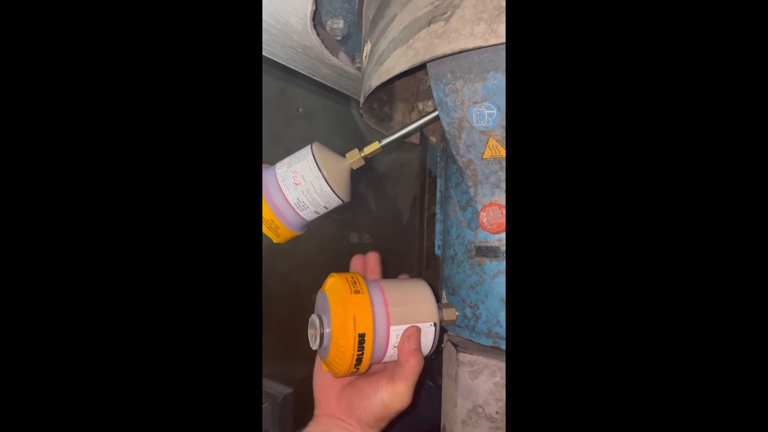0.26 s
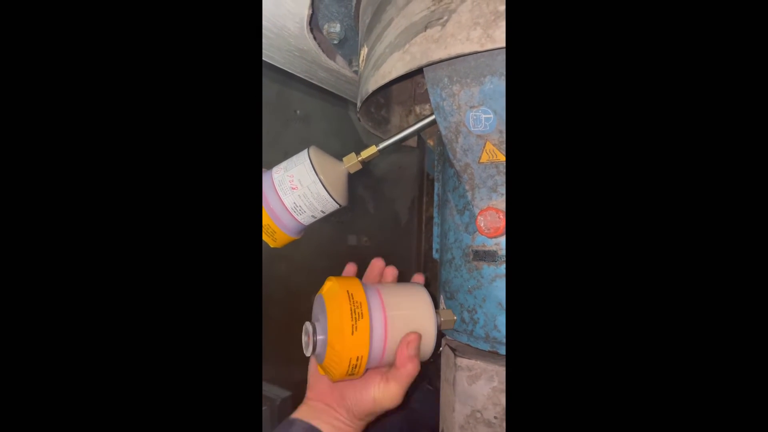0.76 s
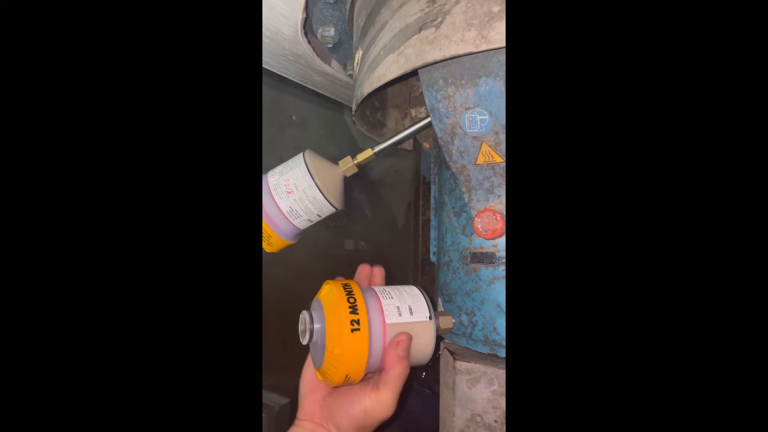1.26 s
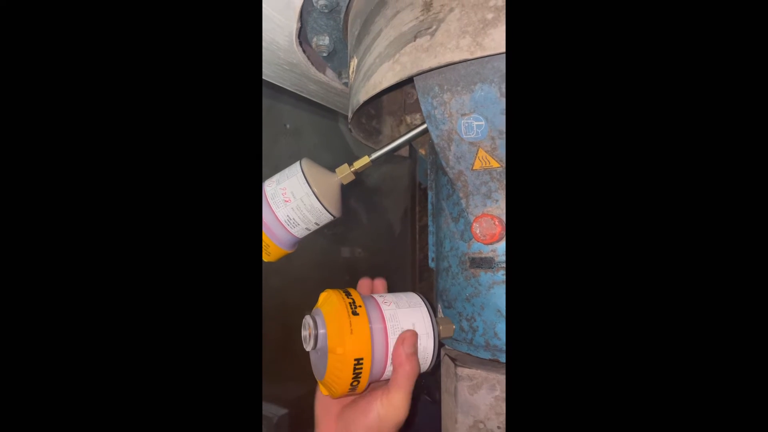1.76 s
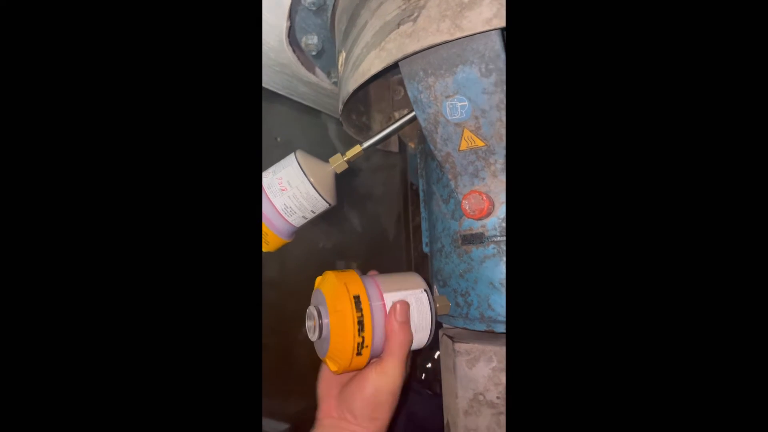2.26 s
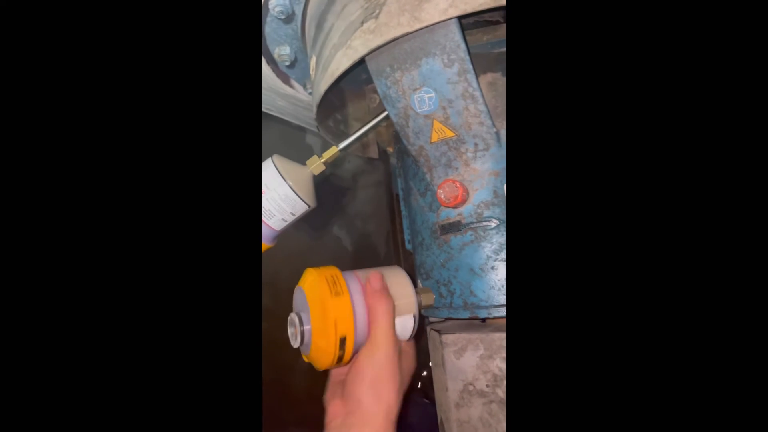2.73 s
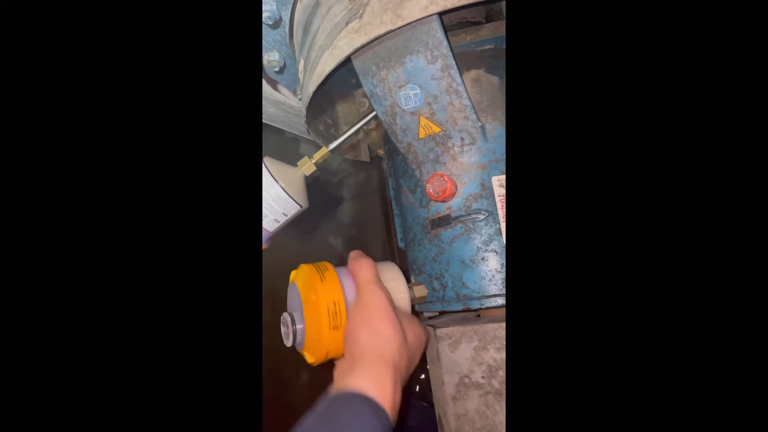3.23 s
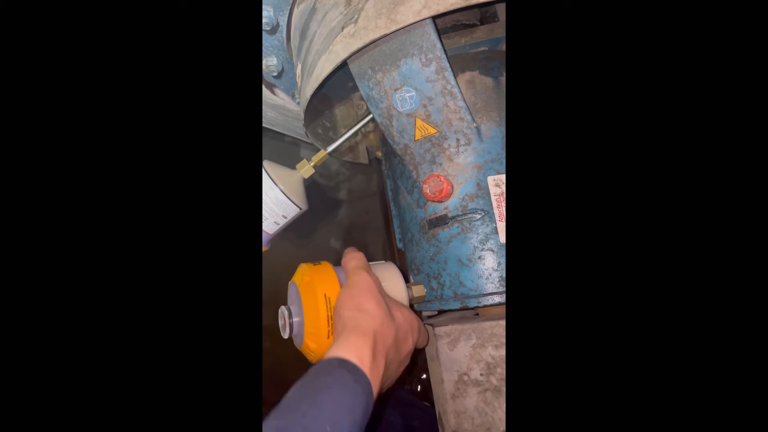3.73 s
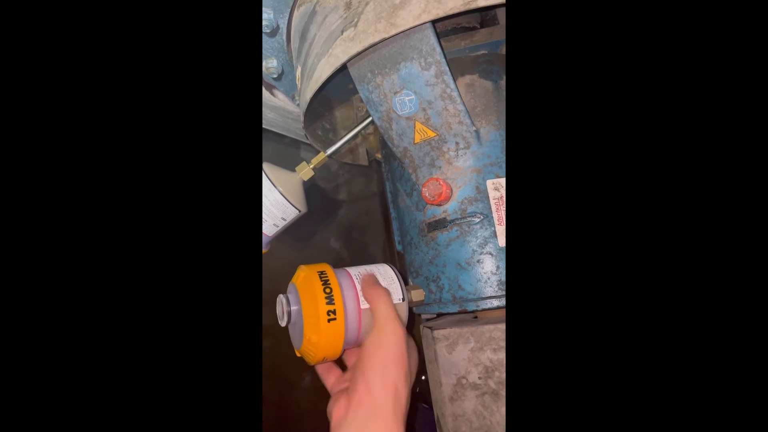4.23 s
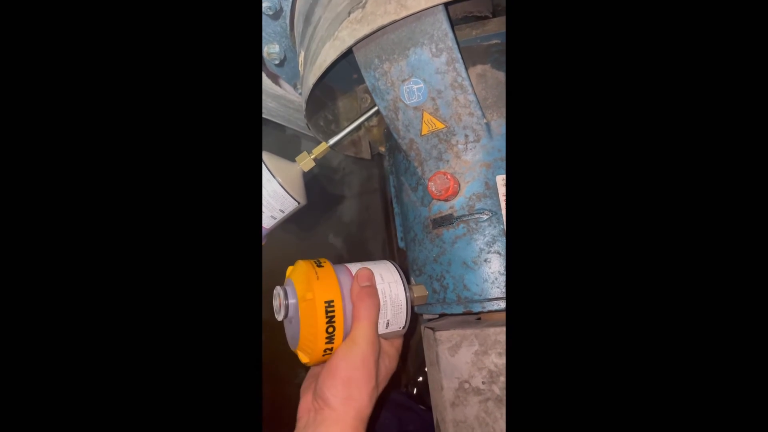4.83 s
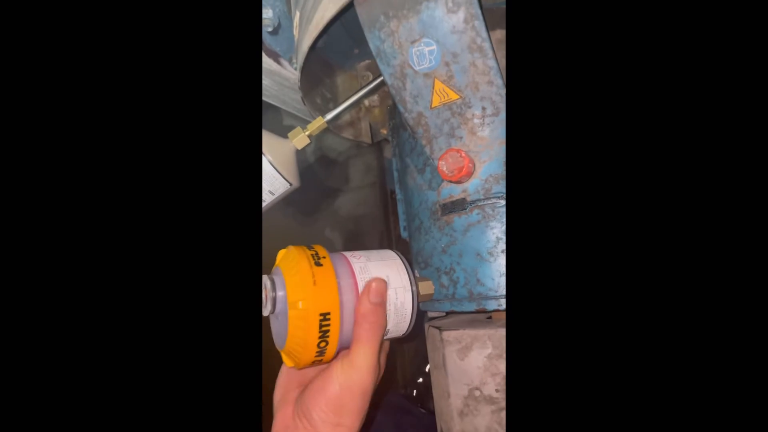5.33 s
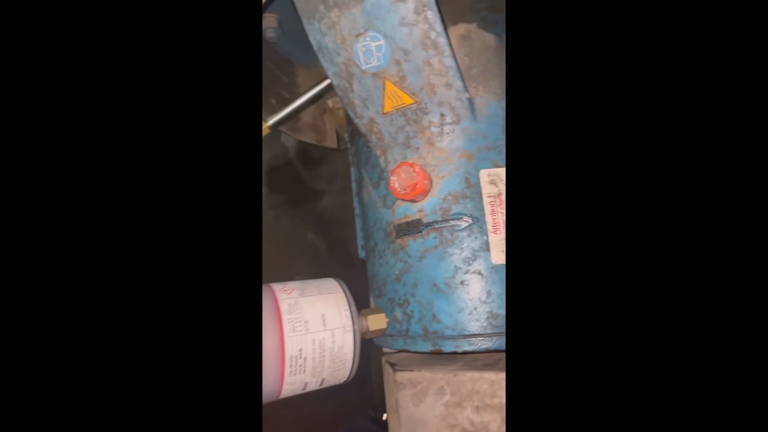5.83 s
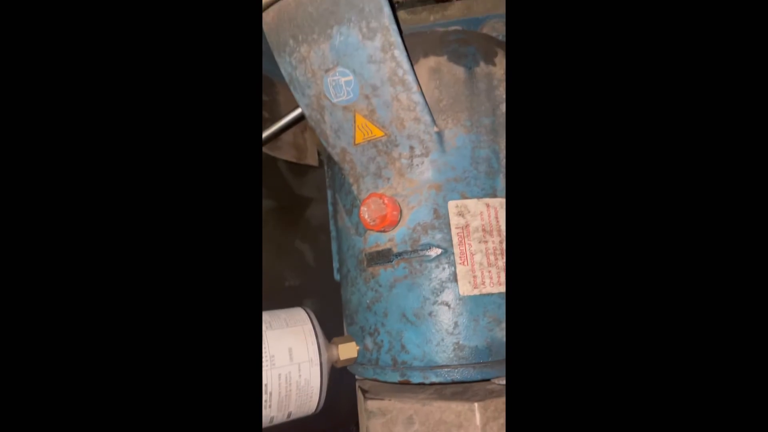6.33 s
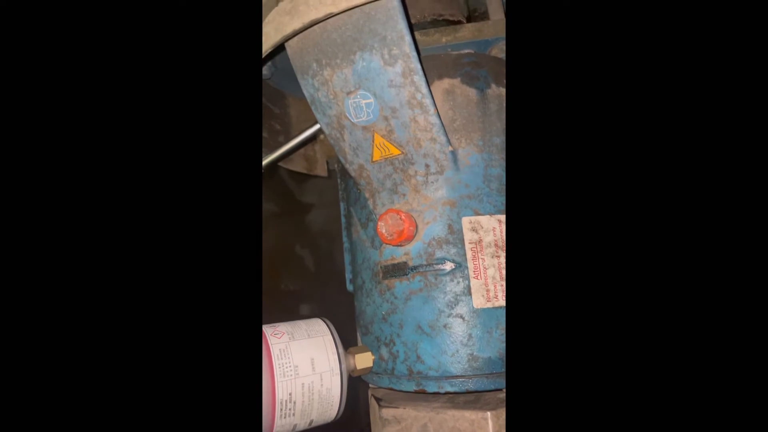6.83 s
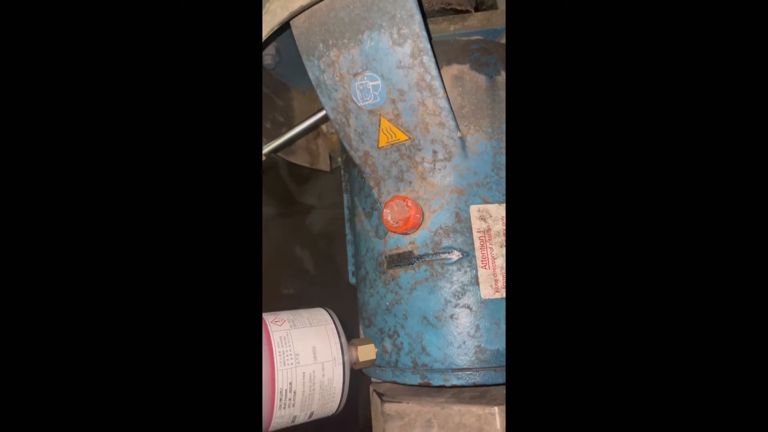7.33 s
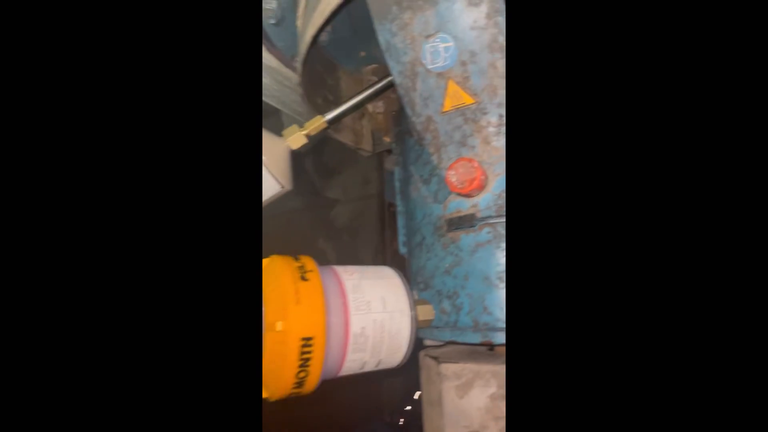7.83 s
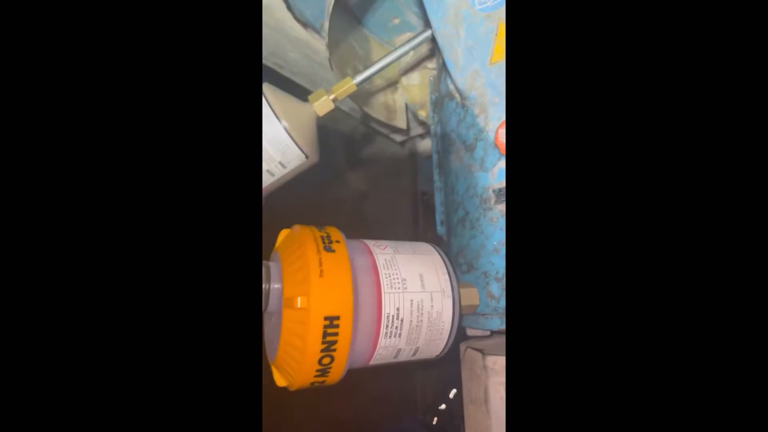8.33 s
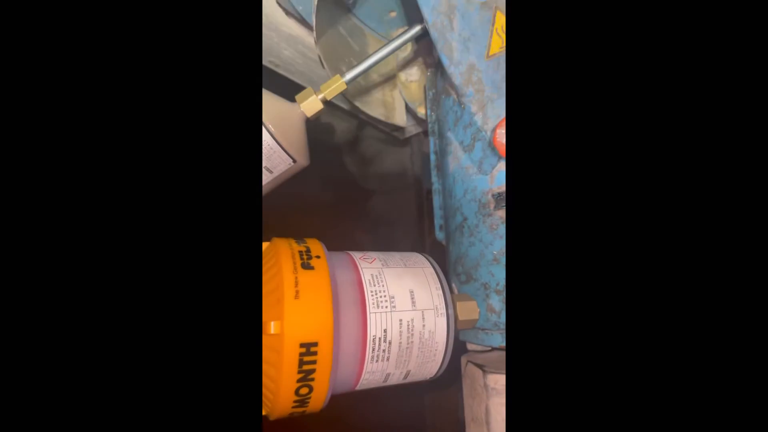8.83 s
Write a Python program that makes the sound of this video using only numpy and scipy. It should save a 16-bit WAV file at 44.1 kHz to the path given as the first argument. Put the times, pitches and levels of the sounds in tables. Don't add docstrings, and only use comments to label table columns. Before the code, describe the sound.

Close, continuous machine rush and deep electrical hum, metallic whines swelling and fading, while a screwed-on grease canister gives a few tiny bright clicks.

```python
import sys
import numpy as np
from scipy import signal
from scipy.fft import rfft, irfft, next_fast_len
from scipy.io import wavfile
from scipy.ndimage import uniform_filter1d

SR = 44100
rng = np.random.default_rng(int(sys.argv[2]) if len(sys.argv) > 2 else 0)


def amplitude_ratio(level_db):
    exponent = np.asarray(level_db, float) / 20
    return 10 ** exponent


def digitize_waveform(pressure):
    field = np.atleast_2d(pressure).T
    bounded = np.clip(field, -1, 1)
    quanta = np.round(bounded * 32767).astype(np.int16)
    wavfile.write(sys.argv[1], SR, quanta)


N = 399987
SIZE = next_fast_len(N)
HZ = np.arange(SIZE // 2 + 1) * SR / SIZE
T = np.arange(N) / SR

# f/Hz, level/dB per Hz
RUSH = [(28, -69), (43, -56), (58, -49), (100, -49), (140, -53), (260, -56), (540, -59), (880, -62),
        (1870, -69), (3700, -69), (6000, -76), (10000, -82), (12900, -93.5), (14600, -88)]
CASING_HZ = [184, 197, 345, 445, 700, 1060, 1972, 2080, 2525, 2640, 2740, 2825, 2945, 3130, 3270, 3565,
             4210, 4410, 5750, 2330, 1500, 8080, 11970]
# width/Hz, rms level/dB, wander/dB
CASING = [(7, -29.5, .8), (6, -35, .8), (50, -42, 1.2), (20, -41.5, 1.2), (70, -37.5, 1.5), (70, -44, 2),
          (18, -49, 2), (70, -50, 1.5), (35, -45, 2.5), (40, -47, 2.5), (30, -45, 2.5), (30, -45, 2.5),
          (28, -46, 2.5), (130, -39, 1.5), (40, -54, 2), (35, -55, 2), (25, -59, 2), (30, -55, 2),
          (350, -53, 1.5), (70, -52, 2), (200, -48, 1.5), (70, -64, 1.5), (50, -71, 1.5)]
WHINE_HZ = [648.4, 1283.2, 1313.5, 2833.6]
WHINE_LEAD_RAD = [-.3, 1.0, 1.6, 1.3]
FLUTTER_DB = [1.8, 1.2, 1.2, 5]
ROUGH_RAD = [.2, .2, .25, .8]
# whine number, t/s, spread/s, left level/dB, right level/dB
LOUD_SPOTS = [(0, .5, .8, -38, -46), (0, 2.84, 2.0, -35.5, -46), (0, 4.5, 1.55, -37, -39),
              (0, 6.24, .76, -34, -40), (0, 7.62, .57, -37, -37), (0, 9.3, .5, -47, -37),
              (1, .74, 1.35, -51, -47), (1, 3.7, 1.1, -48, -37), (1, 6.32, .42, -39, -43),
              (1, 7.74, 1.1, -46, -44), (1, 8.94, .31, -41, -47), (2, .86, 1, -50, -55),
              (2, 4, 1.6, -60, -45), (2, 6.7, 1.2, -50, -44), (3, .75, .6, -55, -47),
              (3, 3.02, .2, -47, -48), (3, 6.46, .72, -38, -44), (3, 7.24, .21, -34, -40),
              (3, 8.32, .22, -55, -43)]
# t/s, peak level/dB
TICKS = [(.077, -31), (.282, -31), (.392, -30), (.594, -25), (.805, -31), (2.107, -30), (2.765, -31),
         (2.906, -24), (3.780, -32), (6.050, -30), (6.360, -31), (7.480, -30)]
HUM_HZ = [59.6, 83.1, 117.8, 120, 155.4, 235.5, 296.1, 328.4, 357, 360, 471, 824.7, 835.8, 845.9, 1400.7,
          1716.3, 3428.8]
HUM_DB = [-42, -40, -40, -41, -45, -35, -39, -42, -41, -44.5, -51, -54, -52, -46, -55, -59, -62]
# t/s, closeness to the casing/dB, how squarely it faces the fan's thin top hiss/dB
NEAR = [(0, -0.5, -2), (.6, -0.5, .8), (1.4, -1, 1), (2.6, 0, .8), (3.3, -0.7, -1.5), (4.6, -1.1, -2.1),
        (5.8, 1, -2.5), (6.3, 0.5, 1), (7.2, 0.6, 0.2), (8.1, .4, 1.5), (8.6, 0, -1), (9.07, .5, -4.5)]
# f/Hz, likeness/0-1, left's lead/rad, left's excess level/dB
PORTS = [(30, .992, 0, 0), (130, .994, 0, .1), (230, .993, -.05, .5), (340, .92, 0, .4), (540, .5, -.75, 1),
         (1000, .33, -.3, -.6), (1400, .33, .1, -1.2), (2100, .68, .4, .4), (2700, .42, 1.3, 1.6),
         (3400, .05, 1.3, .6), (4300, .35, .3, -.3), (5300, .35, .9, 0), (6300, .68, 1.55, 0),
         (9500, .82, 3.0, 0), (13000, .8, 3.1, 0), (15500, .5, 3.3, 0)]

ROOM_DB, RUMBLE_DB, BOOM_DB, ROAR_DB, HISS_DB = 0.6, 0, -2.35, 1.5, 0.6
ROAR_PER_NEAR, HISS_PER_NEAR = 1.3, 0.48


def over_hz(table, hz):
    f, *columns = np.transpose(table)
    log_hz = np.log(np.maximum(hz, 1))
    return [np.interp(log_hz, np.log(f), column) for column in columns]


def walk(rate):
    step = int(SR / rate)
    knots = rng.standard_normal(N // step + 2)
    joined = np.interp(T * SR / step, np.arange(len(knots)), knots)
    return 1.26 * uniform_filter1d(joined, step)


def at_ports(direct, diffuse):
    like, lead, left_db = over_hz(PORTS, HZ)
    like = np.clip(like, 0, 1)
    right = like * np.exp(-1j * lead) * direct + np.sqrt(1 - like ** 2) * diffuse
    return np.array([direct * amplitude_ratio(left_db / 2), right * amplitude_ratio(-left_db / 2)])


def noise():
    direct, diffuse = rfft(rng.standard_normal((2, SIZE)))
    return at_ports(direct, diffuse) * np.sqrt(SR / 2)


def rush(rumble_db, hiss_db, facing_db):
    both = noise() * amplitude_ratio(over_hz(RUSH, HZ)[0])
    half_octave = 2 * np.log2(np.maximum(HZ, 1) / 25)
    out = 0
    for k in range(20):
        band = np.clip(1 - np.abs(half_octave - k), 0, 1)
        near_db = rumble_db if k < 6 else hiss_db * k / 15 + facing_db * (k > 16)
        flicker_db = 0.8 * walk(10)
        out = out + irfft(both * band, SIZE)[:, :N] * amplitude_ratio(near_db + flicker_db)
    return out


def casing(boom_db, roar_db):
    both = noise()
    out = 0
    for hz, (width, db, wander_db) in zip(CASING_HZ, CASING):
        shape = 1 / (1 + ((HZ - hz) / width) ** 2)
        unit_shape = shape / np.sqrt(np.pi / 2 * width)
        ring = irfft(both * unit_shape, SIZE)[:, :N]
        near_db = boom_db * (hz < 250) + roar_db * (hz > 1500)
        fade_db = wander_db * (np.tanh(walk(1.2)) + np.tanh(walk(9)))
        out = out + ring * amplitude_ratio(db + fade_db + near_db)
    return out


def whine(flutter_rate=12):
    out = 0
    for k, hz in enumerate(WHINE_HZ):
        phase = 2 * np.pi * hz * T + ROUGH_RAD[k] * walk(20)
        apart = (WHINE_LEAD_RAD[k] + .35 * walk(.5)) / 2
        power = 0
        for number, s, spread, left_db, right_db in LOUD_SPOTS:
            if number == k:
                peak = amplitude_ratio(np.array([[left_db], [right_db]])) ** 2
                power = power + peak * np.exp(-((T - s) / spread) ** 2)
        flutter = amplitude_ratio(FLUTTER_DB[k] * np.tanh(walk(flutter_rate)))
        out = out + np.sqrt(2 * power) * flutter * np.sin([phase + apart, phase - apart])
    return out


def canister(decay_s=0.0073, low_hz=6000, high_hz=10000):
    t = np.arange(800) / SR
    ticks = np.zeros(SIZE)
    grains = rng.standard_normal((len(TICKS), len(t)))
    for (s, db), grain in zip(TICKS, grains):
        start = int(s * SR)
        ticks[start:start + len(t)] += amplitude_ratio(db) * grain * np.exp(-t / decay_s) / 2
    plastic = signal.butter(2, [low_hz, high_hz], "band", fs=SR, output="sos")
    bright = rfft(signal.sosfilt(plastic, ticks))
    return irfft(at_ports(bright, bright * 1j), SIZE)[:, :N]


def hum(wander_db=6.0, drift_rad=.1):
    out = 0
    for hz, db in zip(HUM_HZ, HUM_DB):
        like, lead, left_db = over_hz(PORTS, hz)
        loose = 1.05 - min(like, 1)
        phase = 2 * np.pi * (hz * T + rng.random()) + drift_rad * walk(2.43)
        sides = []
        for k in range(2):
            side_db = wander_db * np.tanh(walk(0.71)) * loose
            side_phase = 1.1 * loose * walk(0.33) * (like < .9)
            tone = np.sin(phase + side_phase - k * lead)
            sides.append(amplitude_ratio(db + side_db + (1.5 - k) * left_db) * tone)
        out = out + np.sqrt(2) * np.array(sides)
    return out


def patches(x, patchy_db, width_hz, hold_s, size, full_hz=696.0):
    f, s, z = signal.stft(x, SR, nperseg=size)
    field = rng.standard_normal(z.shape[1:])
    for axis, extent in enumerate((width_hz / f[1], hold_s / s[1])):
        count = max(int(extent), 1)
        for _ in range(2):
            field = uniform_filter1d(field, count, axis=axis)
    depth_db = patchy_db * np.clip(f / full_hz, 0, 1)[:, None]
    patchy = z * amplitude_ratio(depth_db * field / field.std())
    return signal.istft(patchy, SR, nperseg=size)[1][:, :N]


def scene():
    s, *place = np.transpose(NEAR)
    near_db, facing_db = (np.interp(T, s, column) for column in place)
    water = rush(RUMBLE_DB, HISS_DB + HISS_PER_NEAR * near_db, facing_db)
    water = water + casing(BOOM_DB, ROAR_DB + ROAR_PER_NEAR * near_db)
    water = patches(water, patchy_db=1.7, width_hz=35.0, hold_s=.4, size=4096)
    water = patches(water, patchy_db=1.5, width_hz=70.0, hold_s=.075, size=2048)
    return amplitude_ratio(ROOM_DB) * water + whine() + canister() + hum()


def low_pass(x):
    return signal.sosfilt(signal.butter(12, 15750, fs=SR, output="sos"), x)


def record(dry):
    return low_pass(dry)


dry = scene()
out = record(dry)
digitize_waveform(out)
```